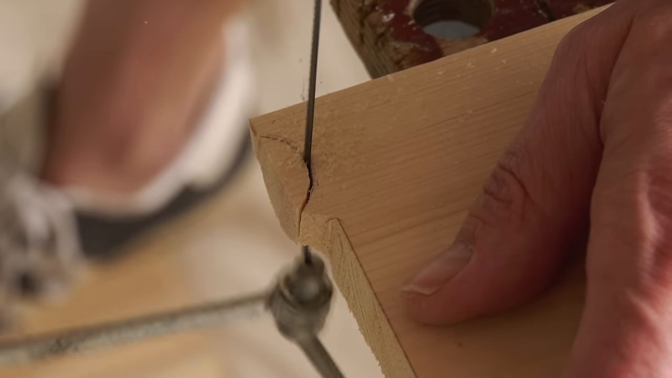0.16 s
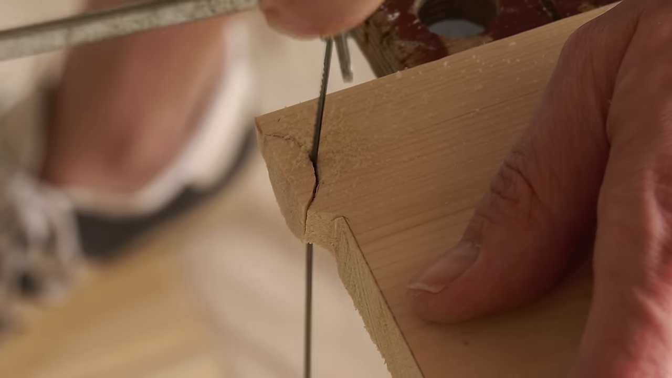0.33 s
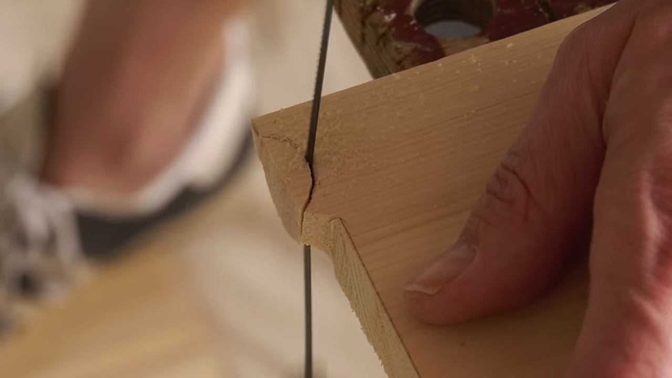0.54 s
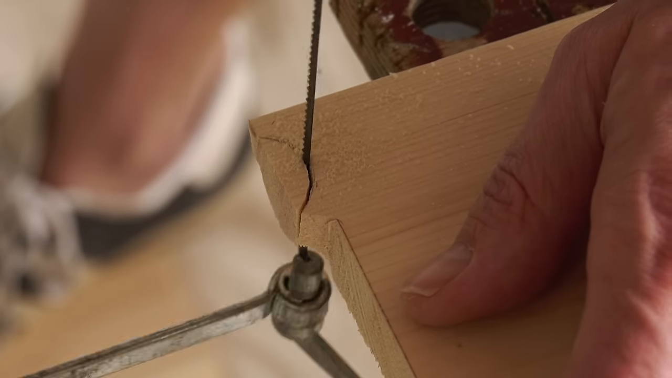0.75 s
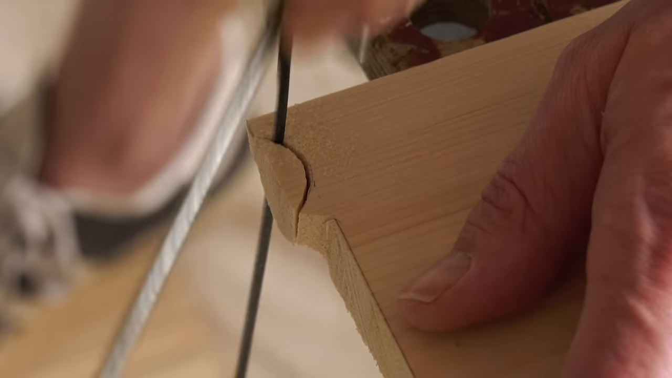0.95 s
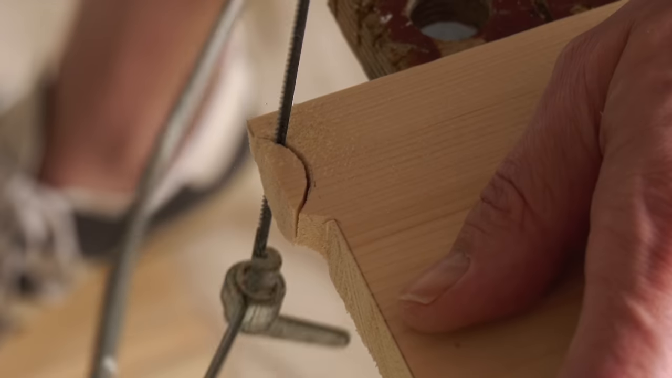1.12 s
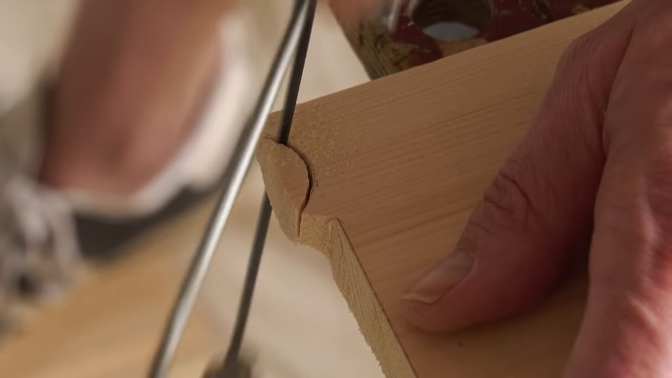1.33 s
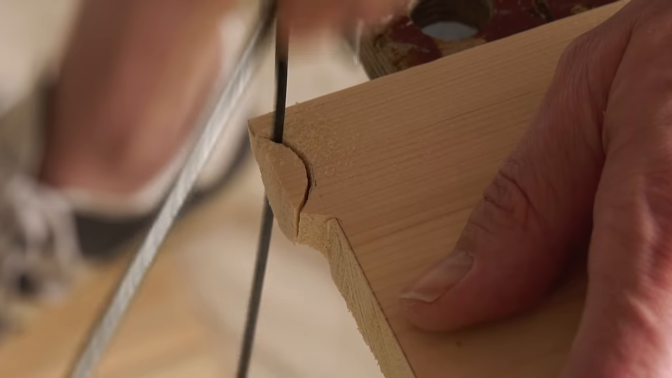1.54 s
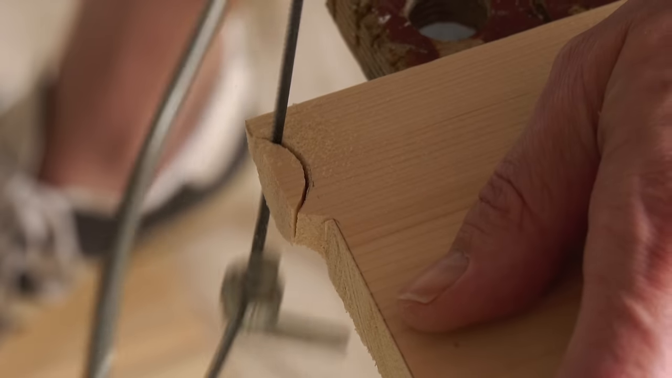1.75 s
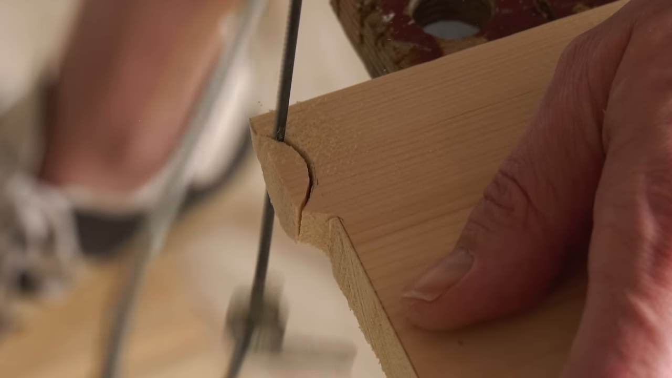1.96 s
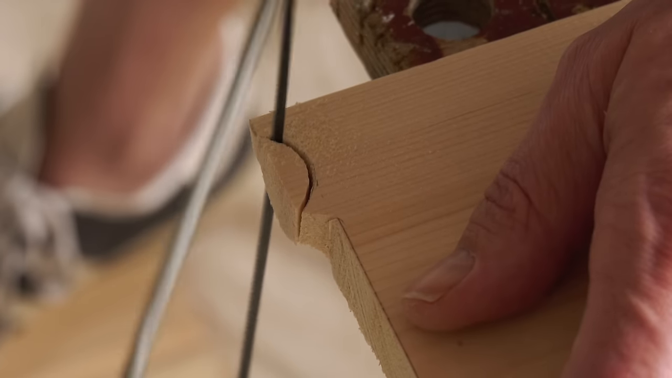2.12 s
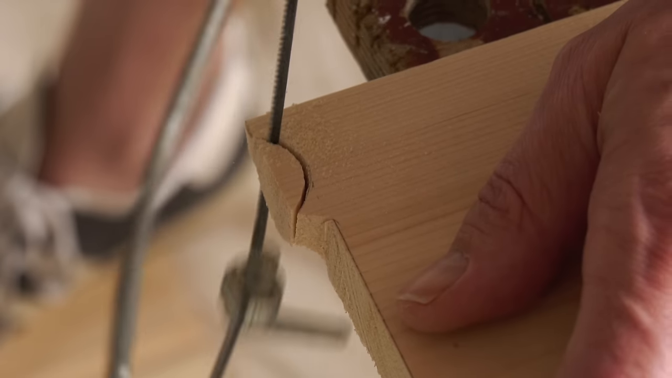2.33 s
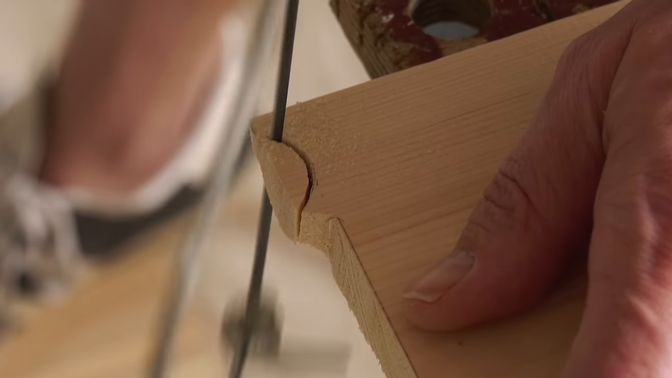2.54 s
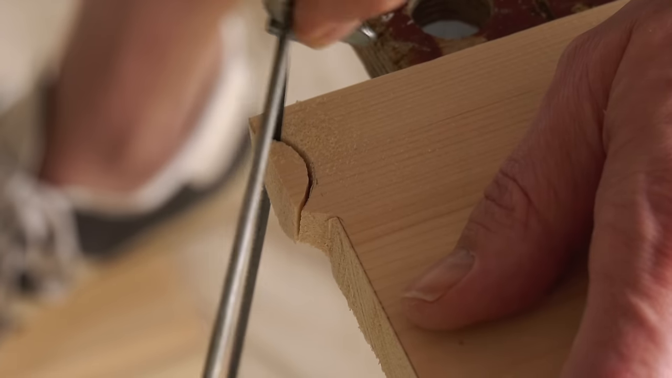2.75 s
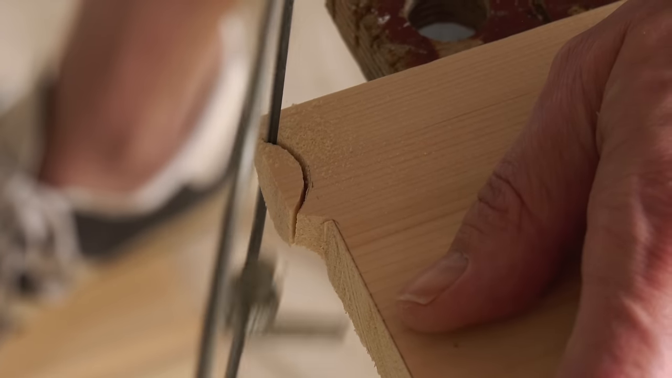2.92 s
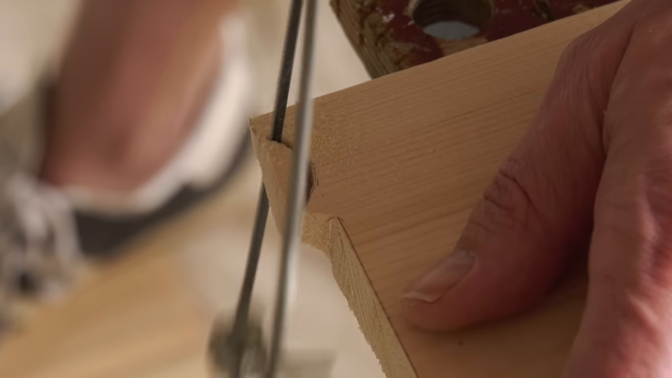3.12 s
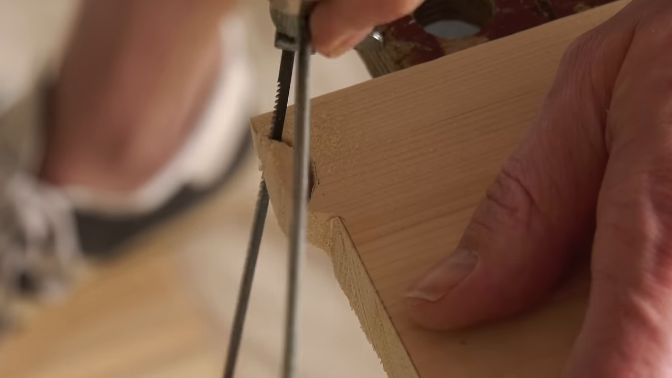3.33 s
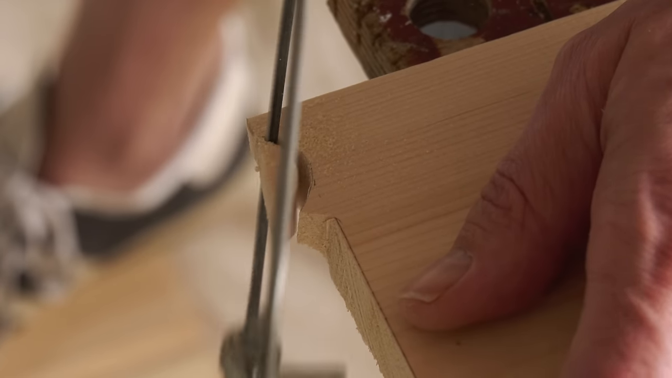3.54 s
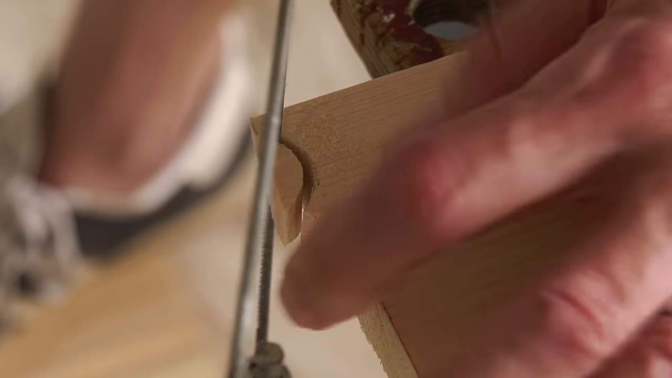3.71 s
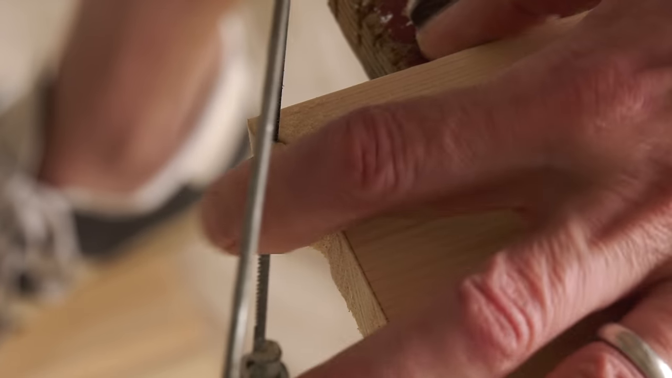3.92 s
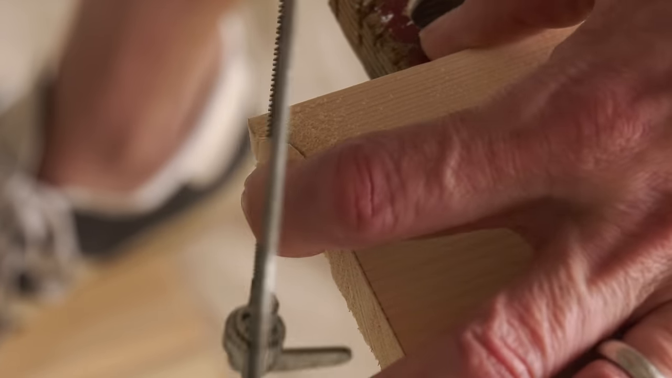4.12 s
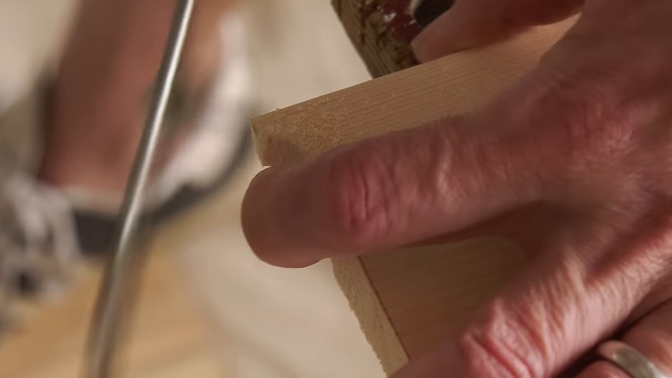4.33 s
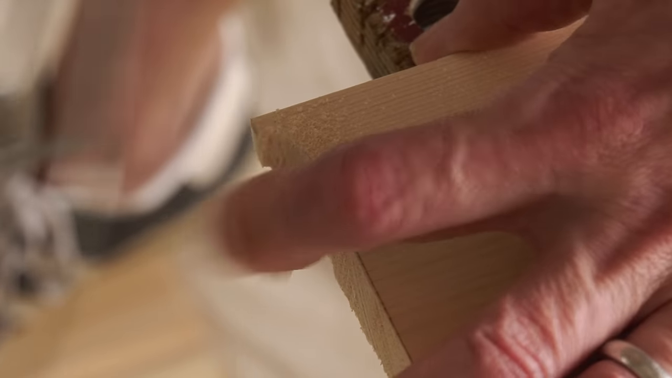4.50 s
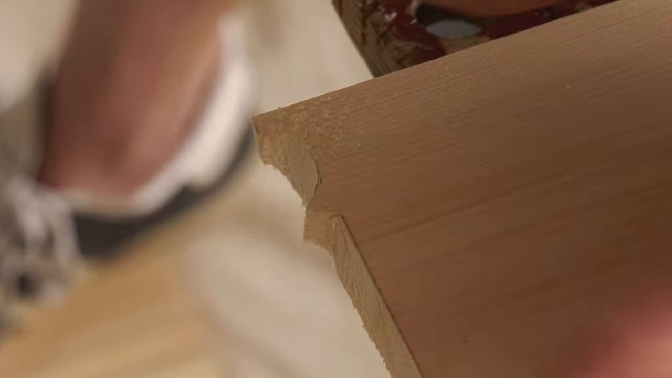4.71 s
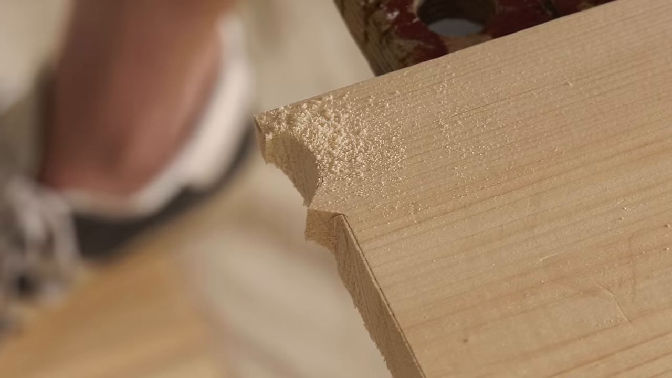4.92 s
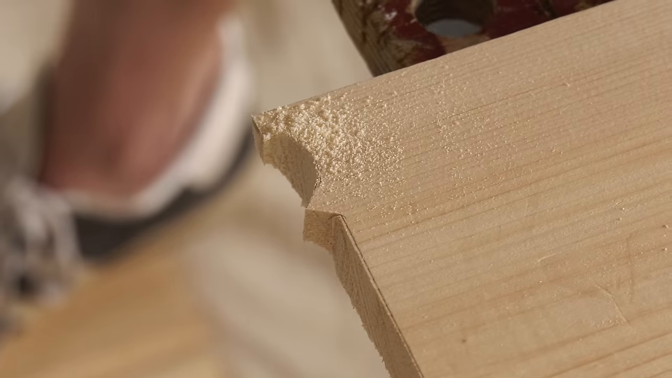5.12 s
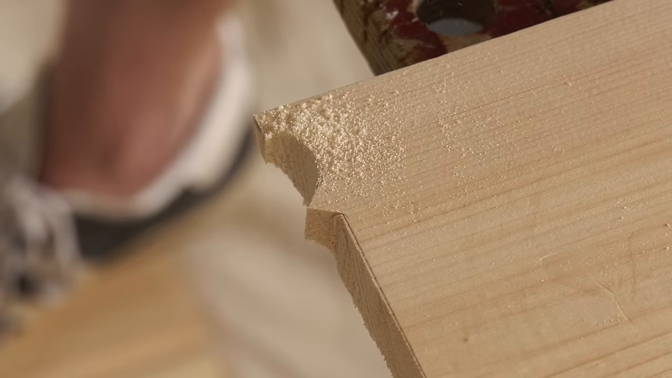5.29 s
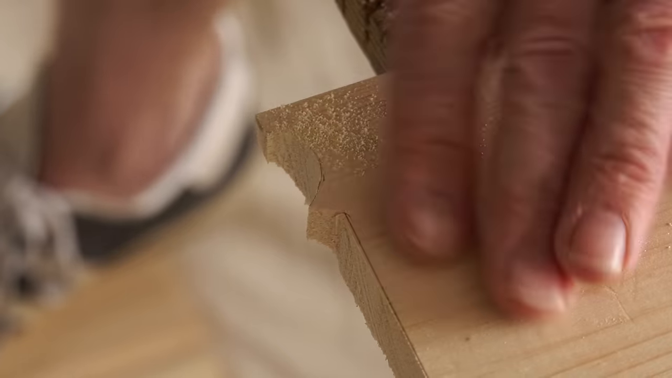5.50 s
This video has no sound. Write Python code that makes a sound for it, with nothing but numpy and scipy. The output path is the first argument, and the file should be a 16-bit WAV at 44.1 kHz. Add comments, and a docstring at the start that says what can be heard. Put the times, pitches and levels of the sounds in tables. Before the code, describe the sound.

A small hand saw rasps through wood in quick, even strokes, then the offcut cracks free and drops to the floor.

```python
"""A fairly live workshop, the microphone close to a board on the bench. A coping saw cuts off a corner:
on each stroke the teeth patter faster, then slower, and sweep through the ring of board and blade.
Once the tooth tone dives with a dull thump; near the end the blade squeaks and creaks. After a faint last
return stroke the offcut cracks free and drops to the floor, farther off, and fingers brush the sawdust
from the board. Over a faint bed of room air, the sound drifts from left to right."""
import sys
import numpy as np
from scipy import signal
from scipy.fft import rfft, irfft, next_fast_len
from scipy.io import wavfile

SR = 44100
rng = np.random.default_rng(int(sys.argv[2]) if len(sys.argv) > 2 else 0)


def waveform_to_disk(signal):
    """Save audio, clipped to [-1, 1], as 16-bit WAV at the path in sys.argv[1]."""
    frames = np.transpose(np.atleast_2d(signal))
    scaled = np.clip(frames, -1, 1) * 32767
    samples = np.round(scaled).astype(np.int16)
    wavfile.write(sys.argv[1], SR, samples)


N = 249585
TIME = np.arange(N) / SR

# cutting strokes: start_s, end_s, top_teeth_per_s, bite (0-1), level_db, fastest_at (share of stroke),
# board_db, treble_db, squawk_db, whine_db
CUTS = [(-.019, 0.084, 518, 0.28, -25.5, 0.61, 2, -0.5, 7.5, 4),
        (.268, 0.369, 583, .61, -27, 0.54, -1, -1.5, 3, 0),
        (0.554, 0.651, 575, 0.49, -31, 0.65, 0.5, 1.5, 10, 1.5),
        (.83, .942, 450, 0.35, -31.5, 0.59, -3.5, -1.5, -4, -8),
        (0.949, 1.055, 577, 0.45, -23.5, 0.63, 0, -0.5, 0.5, -2),
        (1.234, 1.352, 587, 0.41, -24.5, .64, -1, -1, -6.5, -2.5),
        (1.527, 1.638, 567, 0.57, -26.5, 0.61, 0.5, 2, 2, 6.5),
        (1.827, 1.943, 595, 0.42, -24.5, 0.66, 0.5, 1, 1.5, 0.5),
        (2.122, 2.243, 554, 0.44, -28, 0.62, 1.5, 2, 0, 1.5),
        (2.414, 2.539, 500, 0.26, -25.5, .62, 2.5, 0, 5, -6.5),
        (2.706, 2.829, 527, 0.25, -26.5, 0.56, -1.5, 1, 0, -4),
        (2.992, 3.112, 593, 0.48, -23, .6, -0.5, 0, 0, -16.5),
        (3.296, 3.417, 400, .06, -30, 0.5, -1, 1, -3, 0.5),
        (3.575, 3.691, 406, 0.05, -40, .55, 1, -0.5, -9, -7.5)]
# return strokes, the teeth mostly skating: start_s, level_db, bite (0-1), treble_db
RETURNS = [(.11, -39, 0.15, 4.5), (.385, -36.5, 0.07, 1), (.673, -37.5, 0.05, 3.5), (1.061, -32, 0.11, 1.5),
           (1.355, -30.5, 0, -0.5), (1.648, -31.5, .15, 1), (1.945, -29.5, 0.03, 1), (2.258, -28, 0, -0.5),
           (2.554, -26.5, .06, -1.5), (2.84, -28, .09, -1), (3.124, -31, 0.1, -0.5),
           (3.426, -37.5, 0.05, 0.5)]
# blade speed at eleven points along a stroke: share of top speed
BLADE_SPEED = [.32, .53, .68, .8, .9, .97, 1, .945, .81, .61, .54]
# how hollow the sawing sounds, board against rasp: time_s, hollow_db
HOLLOWNESS = [(0, 2), (.75, 5), (.97, -6.5), (1.6, -9.5), (2.4, -10.5), (3.0, -10.5), (3.2, -4.5),
              (3.402, -5.5), (3.65, -6.5), (4.2, 2)]
# the saw's voices (rows: board, frame, kerf, rasp, hiss, squawk, whine):
# level_db, hollow_share, full_bite_db
SAW_VOICES = [(-1, 1, 1.5), (2, 0.41, 7.5), (-6.5, 0.59, -14), (-3, -0.0013, 4), (-16, -0.068, 8),
              (3.5, 0.67, -3.5), (0, 0.51, -4.5)]
# hand pressure, same rows: full_bite_rise_db, heaviest_at, spread (both shares of stroke), taper_power
PRESSURE = [(25, 0.851, 0.2, .8), (12, 0.9, 0.16, .45), (8, 0.88, 0.23, 0.71), (13.9, .83, .11, 1.21),
            (15.747, .86, 0.28, 1.33), (22, .73, 0.19, 1.2), (8, 0.48, 0.37, 1.2)]
# resonances of board, saw frame, cut slot and blade (main and top ring): pitch_hz, width_hz, level_db
BOARD_MODES = [(115, 23, -6), (164, 59, -1.5), (216.4, 49, -14.5), (283, 46, -6.5), (355.5, 34, 3),
               (443.5, 12, 6.5), (523, 74, 2.5)]
FRAME_MODES = [(692, 70, 2.5), (840, 80, -2), (988.6, 45, 5), (1209, 27, 1), (1302, 90, -4),
               (1502, 110, -9), (1691, 87, -2.5)]
KERF_MODES = [(1915, 130, -3.7), (2186, 130, -2.5), (2537, 140, 0.92), (2990, 73, 1)]
BLADE_MODES = [(3044, 40, -0.5), (3290, 100, 0.5), (3463, 128, 6), (3790, 150, 4), (4040, 390, 0.5)]
BLADE_TOP_MODES = [(4520, 330, -0.71), (4990, 420, -1.3)]
# the blade's top ring rises as the cut goes on: time_s, pitch_ratio
TOP_RING_RISE = [(0, 0.98), (1.3, 1.063), (2.7, 1.07), (3.3, 1.135)]
# how strongly wood and saw radiate the tooth tone, and the creak: pitch_hz, level_db
TOOTH_COLOUR = [(150, -14.5), (270, -6.5), (315, -0.5), (355, 5.5), (390, -2), (440, 2.5), (500, 2.5),
                (560, -5.5), (750, -6.5), (900, -17), (980, -3.5), (1045, -1), (1130, -11), (1200, 4),
                (1330, -2), (1550, -5.5), (1690, -4), (1850, -15.5), (2200, -20), (3200, -14)]
CREAK_COLOUR = [(335, -8), (385, -1.5), (700, -3.5), (800, -8.5), (1020, -4), (1110, -17), (1200, 3),
                (1400, -24), (2000, -16)]
# noise of sawn fibres, room air, soft rubbing, tearing wood and splinters: frequency_hz, density_db
FIBRE_SPECTRUM = [(60, -23.5), (3500, -3.5), (6000, -4.5), (7000, -13), (8300, -9), (10000, -12.5),
                  (12000, -22), (14000, -18), (16000, -24)]
AIR_SPECTRUM = [(15, -30), (40, -18), (100, -12), (200, -5), (400, 0), (1000, -8), (2000, -15), (5000, -17),
                (9000, -24), (16000, -29)]
SWISH_SPECTRUM = [(88, -40), (150, -10), (1080, -9.5), (1480, -5), (1630, -12), (2400, -6), (2810, -10),
                  (5680, -3.5), (7000, -9.5), (8600, -8), (16000, -24)]
TEAR_SPECTRUM = [(25, -60.5), (60, -36.5), (105, -11.5), (260, -2.5), (330, -2.5), (520, 2), (620, -4.5),
                 (800, 2), (900, -13.5), (990, 6.5), (1100, -6.5), (1600, -7), (2000, -16.5), (3500, -14.5),
                 (5500, -18.5), (10000, -25.5), (12000, -31), (16000, -34)]
SPLINTER_SPECTRUM = [(40, -55), (200, -30), (1000, -5), (1500, -4), (3000, -9.5), (5000, -1.5), (7000, -10),
                     (10000, -7), (12500, -23), (16000, -21)]
# the workshop's reverberation: frequency_hz, t60_s, level_db
ROOM_TAIL = [(96.5, 0.93, 10), (377, 0.79, 3), (1004, 0.75, 1.5), (2860, 0.57, 2), (3970, 0.33, -5),
             (7740, 0.28, -1.5), (16400, 0.18, -29)]
# standing waves of the room: pitch_hz, width_hz, level_db
ROOM_MODES = [(120.74, 2.6, -9), (170.7, 4, 5.5), (357, 2.8, 2.5), (434, 2.8, 8), (457.3, 1.2, -0.5),
              (510, 3.7, 2), (647, 5.4, -6), (678, 5.6, 2), (882, 4, -7), (1025, 5, -4.5), (1048, 4, -2),
              (1193, 9.4, -3), (1357, 6, -9)]
# slaps from the nearest walls: delay_s, level_db
WALL_ECHOES = [(.027, -12.5), (0.043, -9), (0.071, -9.5)]
# the tooth tone dives to nothing: start_s, stop_s, top_teeth_per_s, level_db
DIVE = (.918, .941, 450, -25)
# a dull low thump as the tooth tone dives: level_db, pitch_hz, length_s
THUMP = (-44, 60, .004)
# the blade rubs the side of the cut: start_s, end_s, pitch_hz, level_db
SQUEAKS = [(2.562, 2.688, 5400, -54), (2.755, 2.799, 3404, -28), (2.862, 2.966, 5100, -34.5),
           (2.871, 2.97, 3347, -32)]
# the blade binds in the last of the cut: time_s, slips_per_s, level_db
CREAK_PATH = [(3.15, 312, -50), (3.175, 338, -32), (3.195, 404, -29), (3.215, 367, -29), (3.235, 376, -36),
              (3.255, 375, -26), (3.287, 340, -47), (3.325, 346, -30.5), (3.36, 348, -49),
              (3.386, 336, -38), (3.424, 308, -55), (3.465, 336, -32), (3.499, 360, -65)]
# soft rubbing swishes, a faint last saw return, then fingers on the board: start_s, end_s, level_db
SWISHES = [(3.73, 3.97, -60.5), (4.76, 4.97, -60), (5.0, 5.25, -63.5), (5.18, 5.44, -58),
           (5.595, 5.72, -39.5)]
# two pushes tear the last bridge of wood: start_s, end_s, level_db
TEARS = [(4.066, 4.21, -37.5), (4.24, 4.325, -28.5)]
# fibres snap: start_s, level_db, decay_s
SNAPS = [(4.1553, -29, 0.0023), (4.311, -20.5, 0.0047), (4.9145, -35.5, 0.0011)]
# the board springs back; the offcut lands: start_s, level_db
RECOIL_TAPS = [(4.292, -16), (4.318, -24)]
LANDING_TAPS = [(4.96, -9), (4.9631, -15), (4.97, -35)]
# resonances of the recoiling board and of the offcut: pitch_hz, width_hz, level_db
RECOIL_MODES = [(129, 30, -3), (170, 43, 6), (304, 64, 8), (467, 50, -8)]
OFFCUT_MODES = [(332, 144, 5.5), (650, 550, 4.5), (1317, 150, 4), (1540, 93, 7), (2380, 1000, 0),
                (3500, 610, 1.5), (4640, 1250, -2)]
# stereo width of the noises at the microphone: frequency_hz, side_to_mid_db
STEREO_WIDTH = [(100, -29), (1000, -10), (4000, -5.5), (7000, -13), (9000, -5), (11500, 8.5), (16000, -3.5)]
# balance at the microphone: time_s, left_minus_right_db
BALANCE = [(0.0, 3), (0.12, 6.0), (0.91, 6.5), (0.96, 2.5), (2.19, 2.5), (2.77, 0.0), (3.14, 1),
           (5.56, -7.5), (5.66, -4)]


def from_db(db):
    return 10 ** (np.asarray(db) / 20)


def rms_one(x):
    return x / np.sqrt(np.mean(x ** 2) + 1e-20)


def in_time(rows):
    return np.interp(TIME, *np.transpose(rows))


def at_hz(points, hz, column=1):
    points = np.array(points)
    return np.interp(np.log(hz + 1), np.log(points[:, 0]), points[:, column])


def convolve(x, response):
    return signal.fftconvolve(x, response)[:N]


def band(x, low_hz, high_hz, order=2):
    return signal.sosfilt(signal.butter(order, [low_hz, high_hz], "band", fs=SR, output="sos"), x)


def noise(spectrum):
    """Noise of the given colour, rms 1."""
    size = next_fast_len(N)
    gain = from_db(at_hz(spectrum, np.fft.rfftfreq(size, 1 / SR)))
    return rms_one(irfft(rfft(rng.standard_normal(size)) * gain, size)[:N])


def stereo_noise(spectrum):
    """Mid and side noise: much alike on both sides of the microphone, except in the top octave."""
    hz = np.geomspace(20, 16000, 60)
    mid_db = at_hz(spectrum, hz)
    side_db = mid_db + at_hz(STEREO_WIDTH, hz)
    side_gain = np.sqrt(np.sum(hz * from_db(side_db) ** 2) / np.sum(hz * from_db(mid_db) ** 2))
    return noise(spectrum) + side_gain * noise(np.c_[hz, side_db]) * [[1], [-1]]


def flutter(rate_hz):
    """Smooth random wavering, mostly slower than rate_hz, rms 1."""
    pole = np.exp(-2 * np.pi * rate_hz / SR)
    return rms_one(signal.lfilter([1], [1, -2 * pole, pole * pole], rng.standard_normal(N + SR))[SR:])


def arch(start, end):
    """Rises from 0 to 1 and falls back between two times, like the speed of a hand."""
    return np.sin(np.pi * np.clip((TIME - start) / (end - start), 0, 1)) * (TIME < end)


def pushes(rows, swell):
    """Loudness of smooth pushes; the higher the swell, the more each peaks in its middle."""
    return sum(from_db(db) * arch(start, end) ** swell for start, end, db in rows)


def body(modes):
    """Response of parallel resonances to a tap, with unit energy."""
    t = TIME[:SR // 2]
    response = sum((-1) ** k * from_db(db) * width * np.exp(-np.pi * width * t)
                   * np.cos(2 * np.pi * hz * t) for k, (hz, width, db) in enumerate(modes))
    return response / np.linalg.norm(response)


def strike(rows, modes):
    """Sharp taps set a body ringing."""
    taps = np.zeros(N)
    for start, db in rows:
        taps[round(start * SR)] = from_db(db)
    return convolve(taps, body(modes))


def drifting_body(x, modes, wander, patchy_db, rate_hz, pitch_ratio=1):
    """Drives resonances that each drift in pitch (by the share `wander`) and in strength."""
    out, at_rest, t = 0, 0, TIME[:SR // 8]
    for k, (hz, width, db) in enumerate(modes):
        pitch_hz = hz * pitch_ratio * (1 + wander * np.tanh(flutter(rate_hz)))
        spin = np.exp(2j * np.pi * np.cumsum(pitch_hz) / SR)
        gain = (-1) ** k * from_db(db) * width
        ring = signal.lfilter([1], [1, -np.exp(-np.pi * width / SR)], x * spin.conj() + 1e-18) * spin
        out = out + gain * from_db(patchy_db * np.tanh(flutter(rate_hz))) * ring.real
        at_rest = at_rest + gain * np.exp(-np.pi * width * t) * np.cos(2 * np.pi * hz * t)
    return out / np.linalg.norm(at_rest)


def strokes(turn_s=.022, return_teeth_per_s=400, fastest_at=.55):
    """All strokes in order, with the columns of a cut; a return ends as the saw turns for the next cut."""
    ends = np.array(CUTS)[:, 0] - turn_s
    returns = [(start, ends[ends > start].min(), return_teeth_per_s, bite, db, fastest_at,
                0, treble_db, 0, 0) for start, db, bite, treble_db in RETURNS]
    return sorted(CUTS + returns)


def arm(overlap_s=0.014):
    """Each stroke gathers speed, then the teeth dig in: pressure peaks while the blade slows quickly."""
    rate, bite, gains = np.zeros(N), np.zeros(N), np.zeros((len(SAW_VOICES), N))
    tenths = np.linspace(0, 1, len(BLADE_SPEED))
    for start, end, top_rate, depth, db, fastest, board_db, treble_db, squawk_db, whine_db in strokes():
        touch = (TIME > start - overlap_s) & (TIME < end + overlap_s)
        along = np.interp(TIME[touch], [start, start + fastest * (end - start), end], [0, .6, 1])
        free = rate[touch] == 0   # in an overlap the earlier stroke sets speed and bite
        rate[touch] += free * top_rate * np.interp(along, tenths, BLADE_SPEED)
        bite[touch] += free * depth
        hollow_db = np.interp((start + end) / 2, *np.transpose(HOLLOWNESS))
        swing = np.abs(np.sin(np.pi * (TIME[touch] - start + overlap_s) / (end - start + 2 * overlap_s)))
        colour = (board_db, 0, 0, treble_db, treble_db, squawk_db, whine_db)
        for gain, colour_db, voice, pressure in zip(gains, colour, SAW_VOICES, PRESSURE):
            voice_db, hollow_share, bite_db = voice
            rise_db, heaviest, spread, taper = pressure
            press = from_db(rise_db * depth * np.exp(-((along - heaviest) / spread) ** 2))
            strength = from_db(db + colour_db + voice_db + hollow_share * hollow_db + bite_db * depth)
            gain[touch] += strength * rms_one(swing ** taper * press)
    return rate, bite, gains


def teeth(rate, jitter=.012, uneven_db=4.5):
    """One tap as each tooth meets the wood; also the count of teeth gone by."""
    passed = np.cumsum(rate * (1 + jitter * flutter(120))) / SR
    hits = np.flatnonzero(np.diff(np.floor(passed)) > 0)
    taps = np.zeros(N)
    taps[hits] = from_db(uneven_db * rng.standard_normal(N)[hits]) * np.sqrt(SR / (rate[hits] + 260))
    return taps, passed


def tooth_tone(rate, passed, bite, board, squawk, whine, boom_db=2.0, waver_db=3.5, harmonics=7):
    """Upper tooth harmonics whine as the blade speeds up; slowing, the second squawks, the first booms."""
    tone = board * from_db(at_hz(TOOTH_COLOUR, rate) + boom_db) * np.sin(2 * np.pi * passed)
    for k in range(2, harmonics + 1):
        strength = from_db(at_hz(TOOTH_COLOUR, k * rate) + waver_db * flutter(61))
        tone += (squawk if k == 2 else whine) * strength * np.sin(2 * np.pi * k * passed)
    return band(np.sqrt(2 * bite) * tone, 160, 6000, order=3)


def saw(tap_share=.45, grit_db=1.5, judder_db=2.5, surge_db=1.6, crackle_db=0.5):
    """Biting teeth sing and tap, skating ones give mostly grit; board, frame, kerf and blade ring."""
    rate, bite, (board, frame, kerf, rasp, hiss, squawk, whine) = arm()
    taps, passed = teeth(rate)
    grit = rms_one(np.exp(-bite * (passed % 1)) * from_db(grit_db * np.tanh(flutter(1000))))
    # uneven grain in the wood makes each stroke surge
    judder = rms_one(from_db(judder_db * np.tanh(flutter(47)) + surge_db * np.tanh(flutter(21))))
    regular = tap_share * bite

    def drive():
        return judder * (np.sqrt(regular) * taps + np.sqrt(1 - regular) * grit * rng.standard_normal(N))

    loose = 1 - bite   # the deeper the bite, the less the parts rattle freely
    wood = drifting_body(loose ** 2 * board * drive(), BOARD_MODES, wander=.0053, patchy_db=3, rate_hz=7.8)
    # the blade's tension and free length keep changing, so the saw's resonances wander
    bow = drifting_body(loose * frame * drive(), FRAME_MODES, wander=.011, patchy_db=4.5, rate_hz=16)
    slot = drifting_body(kerf * drive(), KERF_MODES, wander=.054, patchy_db=4, rate_hz=11)
    steel = drifting_body(rasp * drive(), BLADE_MODES, wander=.031, patchy_db=2, rate_hz=10)
    top = drifting_body(rasp * drive(), BLADE_TOP_MODES, wander=.027, patchy_db=1.5, rate_hz=20,
                        pitch_ratio=in_time(TOP_RING_RISE))
    crackle = rms_one(from_db(crackle_db * np.tanh(flutter(150))))
    fibres = hiss * judder * grit * crackle * stereo_noise(FIBRE_SPECTRUM)
    scrape = (from_db(-3) * band(wood, 91, 590, order=3)
              + from_db(-6) * band(bow, 490, 4700)
              + from_db(-3) * band(slot, 1500, 4000)
              + from_db(-4.5) * band(steel, 2200, 7800, order=3)
              + from_db(-10.5) * band(top, 4500, 7000, order=3)
              + from_db(4.5) * fibres)
    return scrape + tooth_tone(rate, passed, bite, board, squawk, whine)


def workshop(standing_db=-12.5, build_s=.008):
    """The room's answer: a diffuse tail that dies sooner in the treble, standing waves, dull wall slaps."""
    t = TIME[:SR]
    edges_hz = 70 * 2 ** (np.arange(17) / 2)
    white, tail = rng.standard_normal((2, SR)), np.zeros(SR)
    for k, (low, high) in enumerate(zip(edges_hz, edges_hz[1:])):
        hz = np.sqrt(low * high)
        fade = from_db(-60 * t / at_hz(ROOM_TAIL, hz)) * np.clip(t / build_s, 0, 1) ** 2
        gain = from_db(at_hz(ROOM_TAIL, hz, column=2)) / np.linalg.norm(fade)
        tail += gain * band(white[k % 2], low, high) * fade
    tail[:SR // 2] += from_db(standing_db) * body(ROOM_MODES)
    slaps = np.zeros(SR)
    for delay, db in WALL_ECHOES:
        slaps[round(delay * SR)] = from_db(db)
    return tail + band(slaps, 250, 1500)


def dive_and_thump():
    """A dull low thump as the tooth tone dives to nothing."""
    start, stop, top_rate, db = DIVE
    thump_db, thump_hz, length = THUMP
    rate = top_rate * (1 - np.clip((TIME - start) / (stop - start), 0, 1) ** 3)
    cycles_left = (rate.sum() - np.cumsum(rate)) / SR
    dive = from_db(db) * arch(start, stop) * np.sin(2 * np.pi * cycles_left)
    age = TIME - stop
    thump = from_db(thump_db) * np.exp(-(age / length) ** 2) * np.cos(2 * np.pi * thump_hz * age)
    return dive + thump


def blade_squeaks(width_hz=240):
    """Each rub on the side of the cut briefly excites one resonance of the blade."""
    out = np.zeros(N)
    for start, end, hz, db in SQUEAKS:
        rub = arch(start, end) * rng.standard_normal(N)
        out += from_db(db) * drifting_body(rub, [(hz, width_hz, 0)], wander=.048, patchy_db=2, rate_hz=25)
    return out


def blade_creak(jitter=0.0096, waver_db=2.0, harmonics=5):
    """The binding blade sticks and slips at an unsteady rate; its harmonics waver."""
    times, slips_per_s, db = np.transpose(CREAK_PATH)
    rate = np.interp(TIME, times, slips_per_s)
    slips = np.cumsum(rate * (1 + jitter * flutter(98))) / SR
    tone = sum(from_db(at_hz(CREAK_COLOUR, k * rate) + waver_db * np.tanh(flutter(29.8)))
               * np.sin(2 * np.pi * k * slips) for k in range(1, harmonics + 1))
    level = from_db(np.interp(TIME, times, db)) * (TIME > times[0]) * (TIME < times[-1])
    return np.sqrt(2) * tone * level


def rubbing_swishes():
    """Soft friction noise swells and fades: a faint last saw return, then fingers on the board."""
    return pushes(SWISHES, swell=1.34) * stereo_noise(SWISH_SPECTRUM)


def offcut_break(crunch_db=0.5):
    """The last fibres tear in a crunch and part in bright bursts; the board springs back with a thud."""
    tearing = pushes(TEARS, swell=1.3) * rms_one(from_db(crunch_db * flutter(290)))
    bursts = sum(from_db(db) * (TIME >= start) * np.exp(-np.abs(TIME - start) / decay)
                 for start, db, decay in SNAPS)
    crunch = tearing * stereo_noise(TEAR_SPECTRUM)
    splinters = bursts * stereo_noise(SPLINTER_SPECTRUM)
    thud = band(strike(RECOIL_TAPS, RECOIL_MODES), 68.7, 700)
    return band(crunch + splinters + thud, 80, 20000, order=3)


def offcut_landing():
    """The offcut hits the floor with a corner, then slaps flat."""
    return band(strike(LANDING_TAPS, OFFCUT_MODES), 127, 12000, order=3)


def scene(bench_send_db=-5.5, floor_send_db=3.5, air_db=-62):
    """The bench is close to the microphone; the floor is far off and heard mostly through the room."""
    bench = saw() + blade_creak() + blade_squeaks() + offcut_break() + rubbing_swishes()
    floor = offcut_landing()
    into_room = from_db(bench_send_db) * bench.mean(axis=0) + from_db(floor_send_db) * floor
    room = convolve(into_room, workshop())
    air = from_db(air_db) * stereo_noise(AIR_SPECTRUM)
    lean_db = in_time(BALANCE) / 2
    return (bench + dive_and_thump() + floor + room + air) * from_db([lean_db, -lean_db])


def record(dry, cutoff_hz=15900):
    """The microphone's signal, its top cut steeply."""
    return signal.sosfilt(signal.ellip(10, .2, 80, cutoff_hz, fs=SR, output="sos"), dry)


dry = scene()
out = record(dry)
waveform_to_disk(out)
```